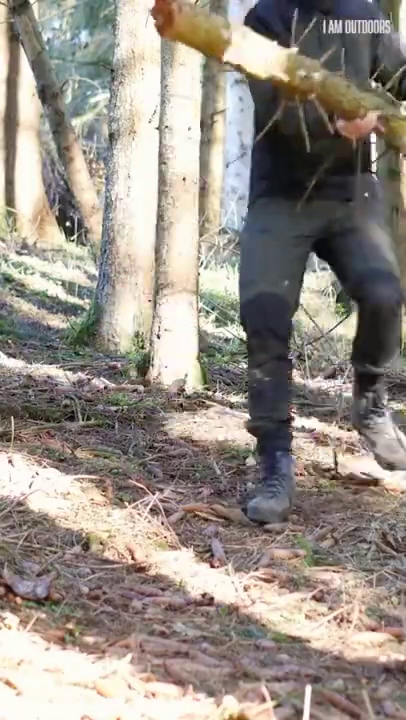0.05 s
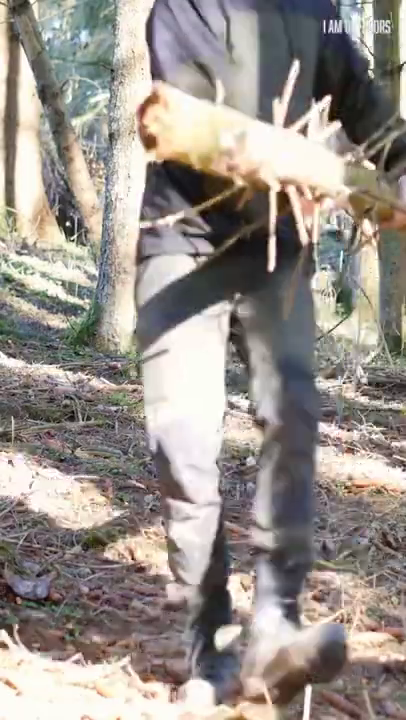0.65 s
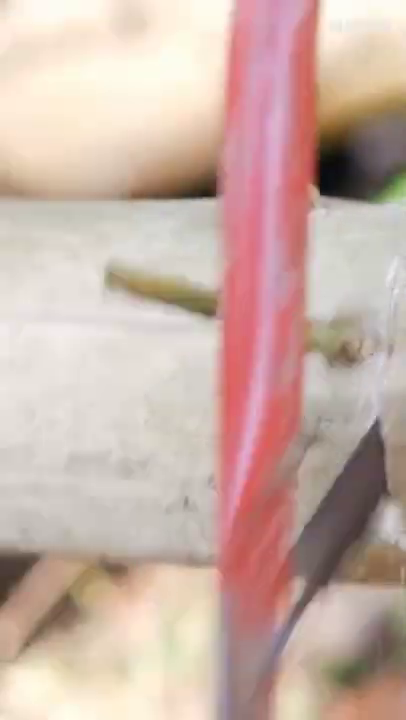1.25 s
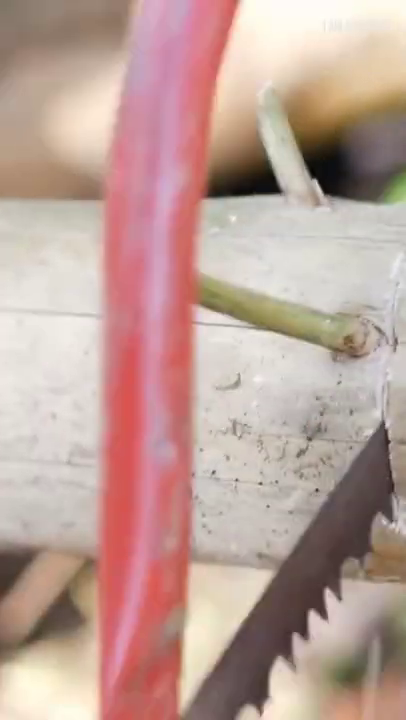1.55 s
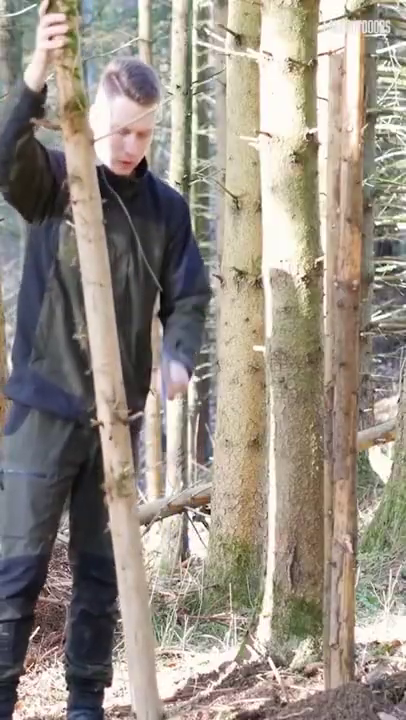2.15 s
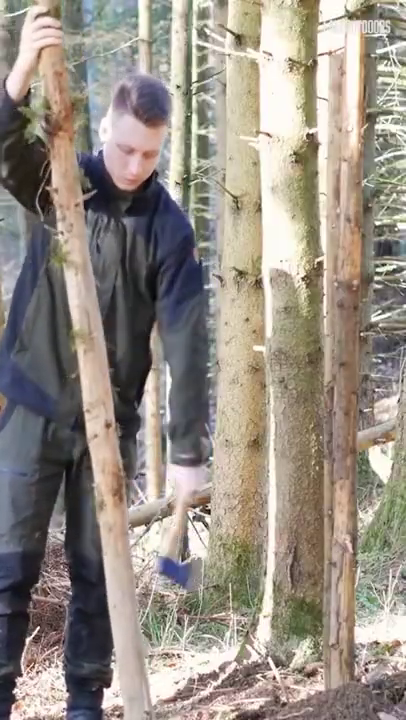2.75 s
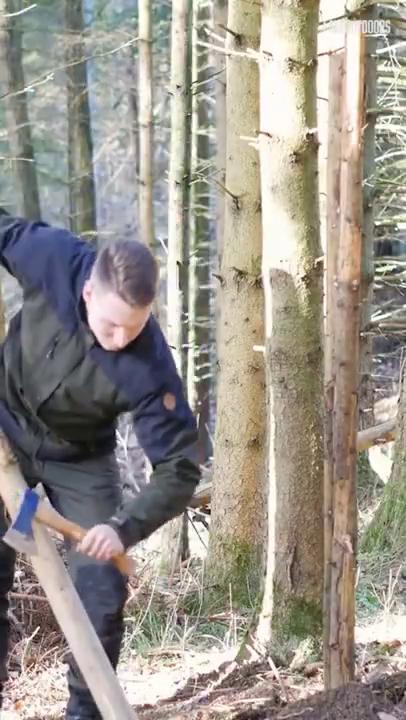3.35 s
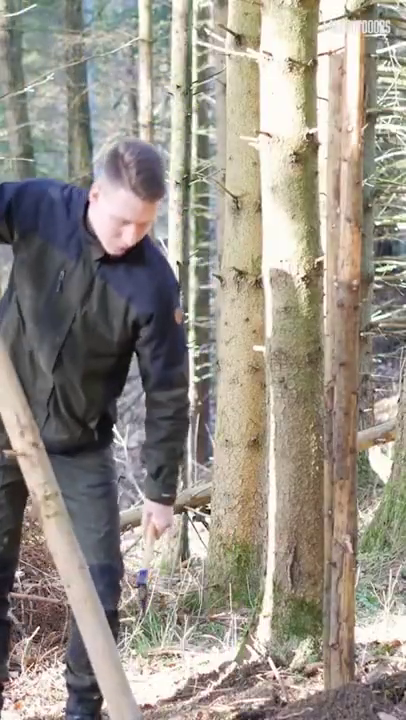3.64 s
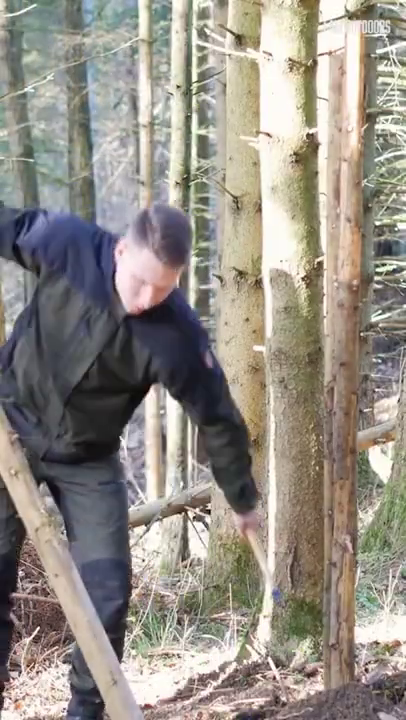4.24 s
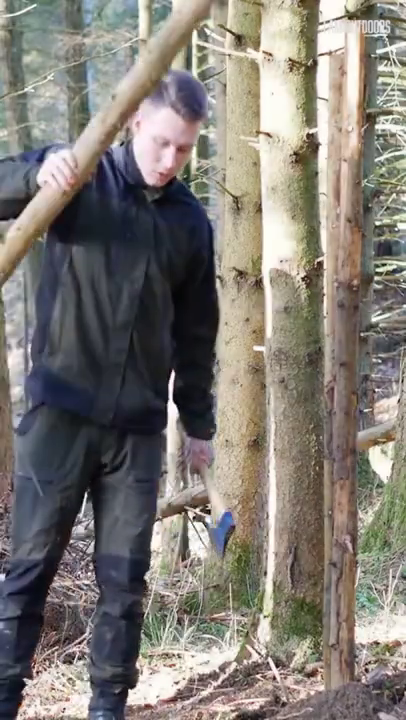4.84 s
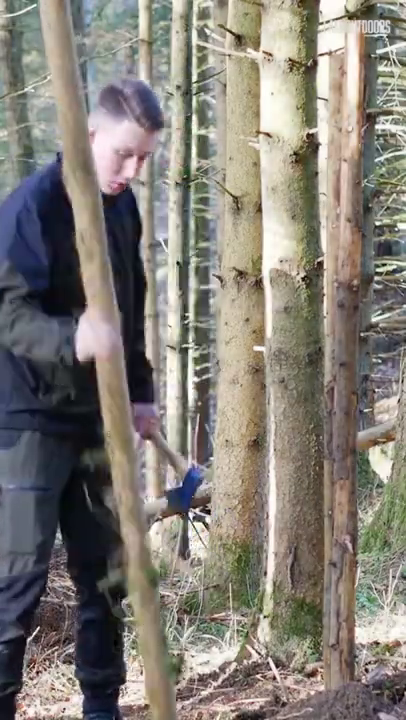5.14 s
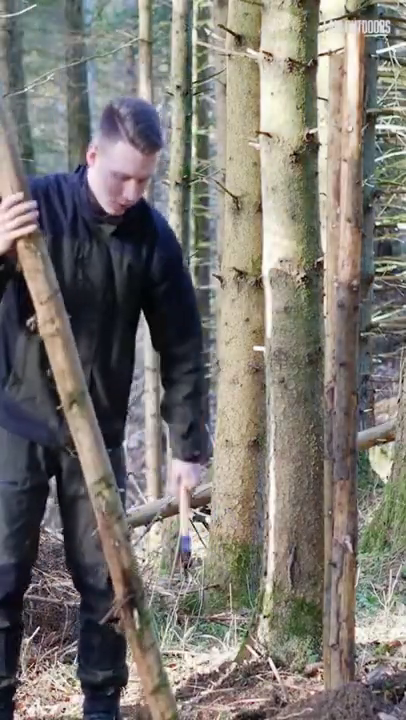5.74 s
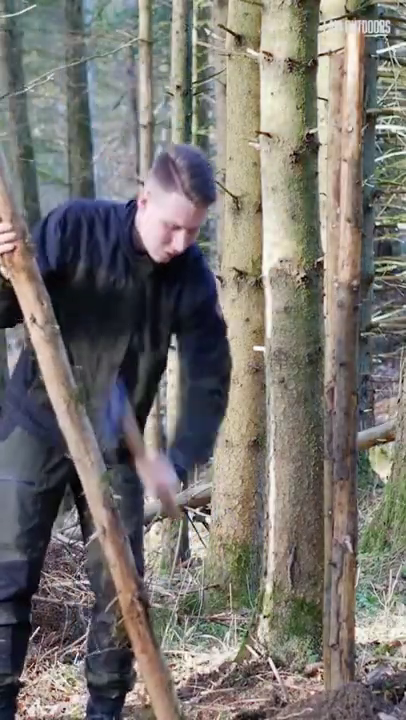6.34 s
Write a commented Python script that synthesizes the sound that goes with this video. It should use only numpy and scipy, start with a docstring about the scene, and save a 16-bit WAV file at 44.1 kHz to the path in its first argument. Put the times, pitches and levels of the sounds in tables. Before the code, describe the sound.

In a quiet forest, dry twigs crackle and snap under boots a little way off. Close to the microphone, a bow saw then rasps through wood for about a second, its strokes unnaturally fast. Farther away, a small hatchet cracks dry branches off a pole with eight sharp, ringing blows, pauses, and strikes four more times. Each blow echoes briefly among the trunks over a soft, steady hiss.

```python
"""Twigs snap under boots, a little way off in a quiet forest: work on a spruce pole, in fast motion.
Close to the microphone a bow saw rasps at twenty strokes a second, its teeth tearing wood fibres.
Then, farther off, a small hatchet cracks off the dry branches in twelve sharp, ringing blows.
The trunks around scatter each sound back over a soft steady hiss."""
import sys
import numpy as np
from scipy import signal
from scipy.fft import rfft, irfft
from scipy.io import wavfile

SR = 44100
rng = np.random.default_rng(int(sys.argv[2]) if len(sys.argv) > 2 else 0)


def unload_wav(signal):
    """Save mono or channel-first audio to the path in sys.argv[1] as 16-bit WAV at rate SR, clipped to [-1, 1]."""
    wavfile.write(
        sys.argv[1],
        SR,
        np.round(np.clip(np.atleast_2d(signal).T, -1, 1) * 32767).astype(np.int16),
    )


N = 281931
FFT_SIZE = 4096
HZ = np.fft.rfftfreq(FFT_SIZE, 1 / SR)

# spectrum of a breaking branch: (frequency [Hz], level [dB])
BRANCH_SPECTRUM = [(30, -24), (250, -23), (600, -16.5), (1000, -9), (1500, -4.5), (2200, -2.5),
                   (4500, -2.5), (6500, -3), (8500, 2), (10500, 3), (13000, 4.5), (15500, 2.5)]
# spectrum of twigs and rustles: (frequency [Hz], level [dB])
TWIG_SPECTRUM = [(40, -27), (300, -23), (800, -12), (2000, -2.5), (4500, -3.5), (8000, -1), (11000, -4.5),
                 (15500, -2.5)]


def gain_of(db):
    """Decibels to amplitude."""
    return 10 ** (np.asarray(db) / 20)


def unit(x):
    """Scales to an energy of one."""
    return x / np.sqrt(np.sum(x ** 2) + 1e-20)


def curve(points, hz=HZ):
    """Joins (Hz, value) points on a log-frequency axis."""
    f, value = np.transpose(points)
    return np.interp(np.log(hz + 1), np.log(f + 1), value)


def add(mix, s, sound):
    """Lays a sound into the mix at s seconds."""
    part = mix[max(round(s * SR), 0):][:len(sound)]
    part += sound[:len(part)]


def coloured(x, curve_db):
    """Minimum-phase filter: everything rings after its cause."""
    cepstrum = irfft(np.log(gain_of(curve_db)))
    cepstrum[1:FFT_SIZE // 2] *= 2
    cepstrum[FFT_SIZE // 2 + 1:] = 0
    return signal.fftconvolve(x, irfft(np.exp(rfft(cepstrum))))


def tone(thud_db=0, body_db=0, bite_db=0, fizz_db=0):
    """The colour of one event as a smooth dB curve."""
    return curve([(300, thud_db), (1100, body_db), (2000, body_db), (3200, bite_db), (5000, bite_db),
                  (8000, 0), (11000, fizz_db)])


def resonance(hz, width, db):
    """One peak as a dB curve."""
    return db / (1 + (2 * (HZ - hz) / width) ** 2)


def ripple(depth_db):
    """Chance peaks and dips, some hundred Hz wide, that depend on the point of contact."""
    return depth_db * np.interp(HZ, np.linspace(0, SR / 2, 70), rng.standard_normal(70))


def fractures(count, per_s, spread_db=3):
    """Wood fibres break at random moments, most small and a few large; rms one."""
    size = gain_of(spread_db * np.minimum(rng.exponential(1, count), 4))
    sign = rng.choice([-1, 1], count)
    breaks = rng.random(count) < per_s / SR
    return np.sqrt(count) * unit(size * sign * breaks)


def snap(s, db, curve_db, rise_s, fall_s):
    """A run of fractures that peaks at s and dies; level over 4 ms; gives its start and its sound."""
    lead_s = .008
    t = np.arange(-lead_s, 4 * lead_s, 1 / SR)
    clicks = fractures(len(t), per_s=16000) * np.exp(np.minimum(t / rise_s, -t / fall_s))
    return s - lead_s, gain_of(db) * np.sqrt(.004 * SR) * unit(coloured(clicks, curve_db))


def crackles(rows, spectrum, per_s, spread_db):
    """Short swells of many small fractures."""
    out = np.zeros(N)
    for s, length, db, fizz_db in rows:
        count = round(length * SR)
        clicks = fractures(count, per_s, spread_db) * signal.windows.tukey(count, .6)
        swell = coloured(clicks, curve(spectrum) + tone(fizz_db=fizz_db))
        add(out, s, gain_of(db) * np.sqrt(count) * unit(swell))
    return out


def forest_air():
    """A soft, steady hiss all around the microphone."""
    # colour of the air: (frequency [Hz], level [dB])
    spectrum = [(30, -34), (170, -32), (450, -25), (700, -19.5), (1100, -9), (1500, -6), (2050, -3.5),
                (2250, -1.5), (2500, -3.5), (3700, -5.5), (6200, -12.5), (6600, -15.5), (8300, -17.5),
                (9500, -21), (14000, -21), (15500, -24)]
    # its slight drift: (time [s], level [dB])
    drift = [(0, -60.5), (.6, -61), (1.8, -59), (4.5, -60), (6.4, -59)]
    colour = gain_of(curve(spectrum, np.fft.rfftfreq(N, 1 / SR)))
    noise = irfft(rfft(rng.standard_normal(N)) * colour, N)
    level_db = np.interp(np.arange(N) / SR, *np.transpose(drift))
    return gain_of(level_db) * np.sqrt(N) * unit(noise)


def whistle(start_s=.21, end_s=.46, level_db=-67, pitch_hz=9100, width_hz=380):
    """A faint, thin, very high whistle during the steps."""
    count, out = round((end_s - start_s) * SR), np.zeros(N)
    band = np.exp(-((np.fft.rfftfreq(count, 1 / SR) - pitch_hz) / width_hz) ** 2)
    noise = irfft(rfft(rng.standard_normal(count)) * band, count)
    add(out, start_s, gain_of(level_db) * np.sqrt(count) * unit(noise * signal.windows.tukey(count, .5)))
    return out


def trunk_echo(early_db=-3, early_s=0.015):
    """Echo of one click: ground and near trunks answer first, farther trunks give a short, smooth tail."""
    # colour of the scatter: (frequency [Hz], level [dB])
    spectrum = [(100, -27), (700, -1.5), (1400, -3), (3500, 0), (6200, 1.5), (7000, 4.5), (9000, -3),
                (9500, 2), (12000, -1.5), (13000, -3), (15500, -0.5)]
    # its decay: (frequency [Hz], time to fall 60 dB [s])
    t60 = [(200, 0.11), (1500, 0.39), (4000, 0.37), (9000, 0.26), (15000, 0.22)]
    t = np.arange(SR // 2) / SR
    taps = rng.standard_normal(len(t)) * (t > .003) * (1 + gain_of(early_db) * np.exp(-t / early_s))
    hz, frame_s, bands = signal.stft(taps, SR, nperseg=256)
    decay_db = 60 * frame_s / curve(t60, hz)[:, None]
    bands *= gain_of(curve(spectrum, hz)[:, None] - decay_db)
    return unit(signal.istft(bands, SR, nperseg=256)[1])


def rustling():
    """Needle litter and clothing rustle in swells of tiny clicks."""
    # rustles: (time [s], length [s], level [dB], fizz [dB])
    rustles = [(0, 0.037, -56, 1), (.03, 0.54, -63, 1.5), (.495, 0.044, -49, 5), (.53, .044, -45.5, 2.5),
               (.625, .11, -51.5, -4), (1.72, .026, -40.5, 4.5), (2.412, .046, -57.5, -4),
               (4.25, .085, -63.5, 7)]
    return crackles(rustles, TWIG_SPECTRUM, per_s=3000, spread_db=3)


def twigs(lift_db=12, rolloff_db_per_octave=5):
    """Each twig breaks in a brief cluster of clicks around its own pitch; thick ones sound duller."""
    # dry twigs underfoot: (time [s], level [dB], pitch [Hz])
    breaks = [(.043, -53, 1740), (.145, -56, 1380), (.287, -59, 1200), (0.4181, -43, 2350),
              (.464, -51.5, 1890), (.498, -43, 11800), (.5065, -31.5, 7000), (.547, -44.5, 2330),
              (.5522, -41, 4700), (.63, -45.5, 13100), (5.376, -52, 1180)]
    out = np.zeros(N)
    for s, db, hz in breaks:
        octaves_above = np.log2(np.maximum(HZ / hz, 1))
        curve_db = curve(TWIG_SPECTRUM) + resonance(hz, hz, lift_db) - rolloff_db_per_octave * octaves_above
        add(out, *snap(s, db, curve_db, rise_s=0.00084, fall_s=0.0021))
    return out


def tearing_fibres():
    """The last fibres crackle apart as a branch gives way."""
    # tears: (time [s], length [s], level [dB], fizz [dB])
    tears = [(2.083, 0.0059, -27.5, 4), (2.296, 0.0096, -41, -3), (5.513, 0.031, -42.5, 5),
             (5.753, .014, -28.5, 5.5)]
    return crackles(tears, BRANCH_SPECTRUM, per_s=6700, spread_db=4)


def hatchet(force_db=4, echo_db=-14.5, ring_echo_db=7.5, brittleness=0.53):
    """The edge cracks through a branch in a few milliseconds, the modes ring and the trunks answer."""
    # blows: (time [s], level before force_db [dB], rise [s], thud [dB], brightness [dB], ringing [0-1],
    # most excited frequency [Hz], pitch of the branch [Hz])
    blows = [(1.8775, -28, .002, 2, -2, 0.43, 3000, 2100), (2.079, -25, 0.00076, -5, 4.5, 0.4, 2200, 2050),
             (2.2914, -26, 0.00083, -2, 3, .5, 2200, 2150), (2.568, -30, .001, 1, -2.5, 0.25, 3400, 2560),
             (2.968, -23, 0.00086, -2, -2.5, 1, 5150, 1700),
             (3.2605, -25.5, 0.0012, -5.5, -.5, 0.39, 3000, 4700),
             (3.7039, -21.5, 0.00092, -4.5, -1, 0.58, 5000, 1860),
             (4.0241, -25, 0.001, -2, -5.5, 0.49, 3530, 3800),
             (5.505, -27, 0.0011, 8, 1.5, 0.68, 3970, 1350),
             (5.751, -30.5, 0.00062, 7.5, 2, 0.57, 4030, 2660),
             (5.9947, -33, 0.0015, 2.5, -0.5, 0.62, 3020, 2870),
             (6.2281, -25.5, 0.0032, 3, -0.5, 0.71, 4340, 3900)]
    # modes of hatchet and pole: (frequency [Hz], width [Hz], lift before weighting [dB])
    modes = [(1316, 240, 7.5), (2190, 180, 7), (2987, 120, 11.5), (3856, 360, 9.5), (4760, 330, 9),
             (5700, 300, 7.5), (9600, 220, 5), (10280, 580, 5), (11200, 400, 4.5)]
    tilt = tone(thud_db=0.5, body_db=-0.75, bite_db=-.5, fizz_db=0.52)
    out = np.zeros(N)
    for s, db, rise_s, thud_db, bright_db, ringing, excited_hz, branch_hz in blows:
        wood_db = curve(BRANCH_SPECTRUM) + tone(thud_db) + bright_db * tilt
        modes_db = 0
        for hz, width, lift_db in modes:
            # where the blow lands decides which modes take most of its force
            weight = 1 + 0.98 * np.exp(-(np.log(hz / excited_hz) / 0.15) ** 2)
            modes_db += ringing * weight * resonance(hz, width, lift_db)
        branch_db = resonance(branch_hz, width=0.23 * branch_hz, db=6.5)
        # a dry, ringing branch breaks faster and sends more sound to the trunks
        fall_s = 0.0044 * np.exp(-brittleness * ringing)
        echo_gain = gain_of(echo_db + ring_echo_db * ringing)
        start, crack = snap(s, db + force_db, wood_db + branch_db + 0.96 * modes_db, rise_s, fall_s)
        add(out, start, crack)
        # the modes outlast the crack, so they stand out more in the scattered tail
        tail = unit(coloured(trunk_echo(), wood_db + 1.3 * modes_db + ripple(depth_db=2)))
        add(out, s, echo_gain * np.linalg.norm(crack) * tail)
    return out


def saw_strokes(push_share=.49, pull_fastest=.43):
    """Pushes and weaker pulls in turn: (time [s], length [s], level [dB], fastest point [0-1])."""
    # saw cycles: (time [s], push [dB], pull [dB], fastest point of the push [0-1])
    cycles = [(.693, -22.5, -26, .32), (.785, -22.5, -29, .48), (.883, -23, -28.5, 0.51),
              (.988, -23.5, -29.5, 0.47), (1.09, -26.5, -28.5, 0.41), (1.192, -25, -29, .5),
              (1.298, -24, -32, .5), (1.396, -27.5, -28, 0.5), (1.486, -23.5, -29, 0.52),
              (1.586, -24, -27.5, 0.46)]
    # closing stroke: (time [s], length [s], level [dB], fastest point [0-1])
    last_push = (1.68, 0.0458, -24, 0.44)
    rows, starts = [], [row[0] for row in cycles] + [last_push[0]]
    for (s, push_db, pull_db, fastest), period in zip(cycles, np.diff(starts)):
        push_s = push_share * period
        rows += [(s, push_s, push_db, fastest), (s + push_s, period - push_s, pull_db, pull_fastest)]
    return rows + [last_push]


def bow_saw(peak_tooth_hz=900, tooth_depth=0.4, binding_db=2, overlap_s=.003):
    """Teeth tear fibres as fast as the blade moves; it almost rests at each turn."""
    # wood torn by the teeth: (frequency [Hz], level [dB])
    rasp_spectrum = [(40, -53), (300, -49), (550, -31.5), (900, -20), (1300, -9.5), (2000, -6), (3500, -6),
                     (6000, -7), (8500, -8), (9200, -11), (11000, -11.5), (12700, -6), (15500, -9)]
    # resonances and dead spots of the blade in its cut: (frequency [Hz], width [Hz], lift [dB])
    blade_modes = [(760, 46, 7.5), (942, 41, 9), (1174, 12, 7), (1339, 28, 9), (1568, 34, 7.5),
                   (2470, 210, 7.5), (2880, 190, -9.5), (3089, 160, 10), (3980, 150, 4.5),
                   (4540, 100, -3.5), (4740, 90, 3.5), (6080, 230, 6), (6720, 180, -5), (7850, 100, 1.5)]
    # colour as the cut deepens: (time [s], body [dB], bite [dB], fizz [dB])
    cut_tone = [(.7, -4, -2.5, -3.5), (1.12, -2, -3.5, -3), (1.33, 0, -2, 0), (1.7, 0, -0.5, 1)]
    # teeth catching hard on a knot: (time [s], level [dB], pitch [Hz])
    catches = [(.747, -19.5, 6100), (.773, -27, 1380), (0.8533, -21.5, 2900), (1.212, -19.5, 3340),
               (1.311, -23.5, 3020), (1.407, -21.5, 1670)]
    # dull bump of the pole: (frequency [Hz], level [dB])
    bump_spectrum = [(30, -0.5), (180, 0.5), (400, 3), (1000, -35), (4000, -60)]
    out, strokes = np.zeros(N), saw_strokes()
    blade_db = curve(rasp_spectrum) + sum(resonance(*mode) for mode in blade_modes)
    cut_s, *cut_db = np.transpose(cut_tone)
    for s, length, db, fastest in strokes:
        progress = np.linspace(0, 1, round((length + overlap_s) * SR))
        skew = np.log(.5) / np.log(fastest)
        speed = np.sin(np.pi * progress ** skew)
        teeth = 1 + tooth_depth * np.cos(2 * np.pi * np.cumsum(peak_tooth_hz * speed) / SR)
        # the blade binds and frees itself several times within a stroke
        binding = gain_of(binding_db * np.interp(progress, np.linspace(0, 1, 14), rng.standard_normal(14)))
        drive = fractures(len(progress), per_s=14000) * teeth * binding * (0.1 + abs(speed) ** 1.7)
        curve_db = blade_db + tone(0, *(np.interp(s, cut_s, band) for band in cut_db))
        # its free length changes as it travels, so each quarter of a stroke has its own colour
        rasp = sum(coloured(drive * (np.floor(4 * progress) == quarter), curve_db + ripple(depth_db=3))
                   for quarter in range(4))
        add(out, s - overlap_s / 2, gain_of(db) * np.sqrt(len(progress)) * unit(rasp))
    # the teeth also bite lightly a third of the way into every stroke; columns as in catches
    bites = [(s + .33 * length, -29, 3140) for s, length, _, _ in strokes]
    for s, db, hz in catches + bites:
        add(out, *snap(s, db, blade_db + resonance(hz, hz / 3, db=20), rise_s=0.0012, fall_s=0.0026))
    for s, _, _ in bites[::2]:  # every push shifts the pole
        bump_db = -65.5 + 3 * rng.standard_normal()
        add(out, *snap(s, bump_db, curve(bump_spectrum), rise_s=0.0012, fall_s=0.0052))
    return out


def scene():
    """One microphone: the saw is close and dry; boots and hatchet are farther off among the trees."""
    air, blows, sawing = forest_air(), hatchet(), bow_saw()
    tearing = tearing_fibres()
    steps = twigs() + rustling()
    to_trunks = gain_of(-13) * steps + gain_of(-12) * tearing + gain_of(-33.5) * sawing
    echo = signal.fftconvolve(to_trunks, trunk_echo())[:N]
    return (air + whistle() + echo + steps + tearing + blows + sawing)[None]


def record(dry):
    """The recorder cuts off the highest treble."""
    lowpass = signal.firwin(511, cutoff=15650, window=("kaiser", 8), fs=SR)
    return signal.oaconvolve(dry, lowpass[None], "same")


dry = scene()
out = record(dry)
unload_wav(out)
```